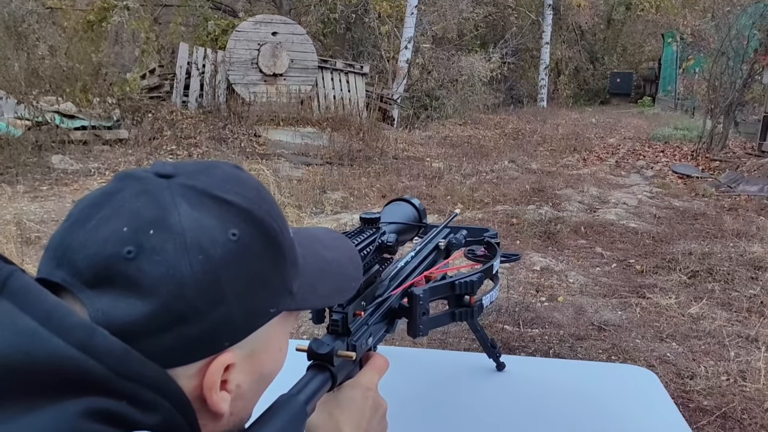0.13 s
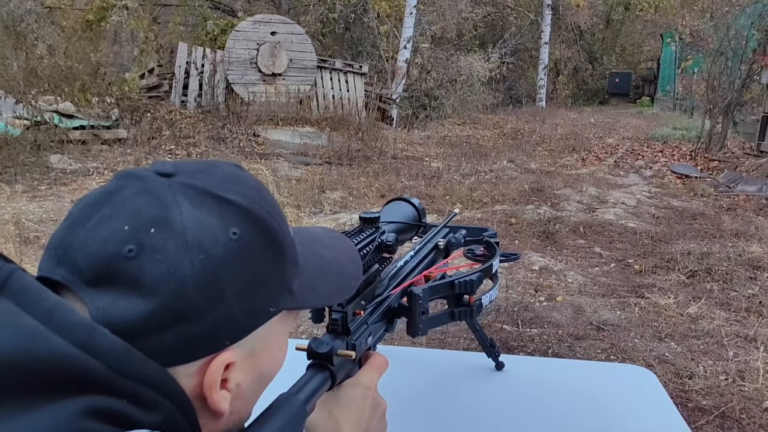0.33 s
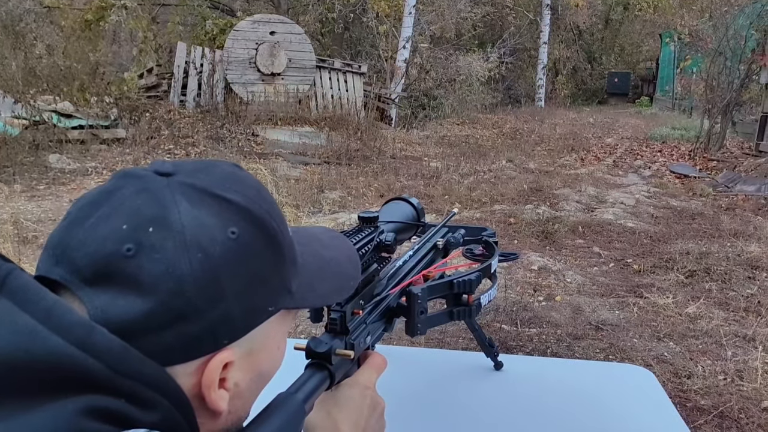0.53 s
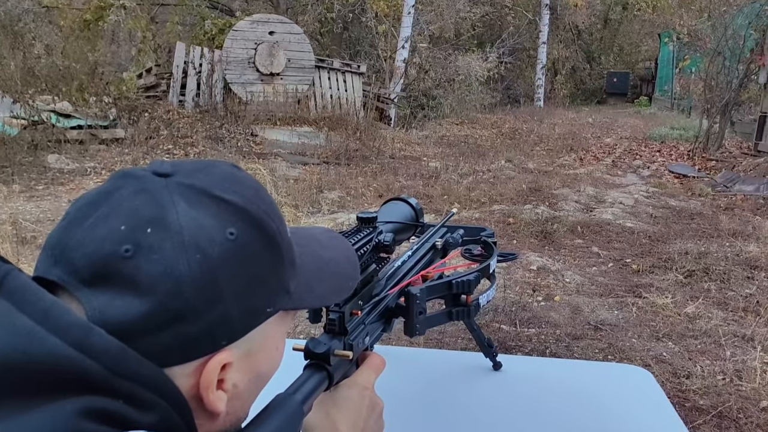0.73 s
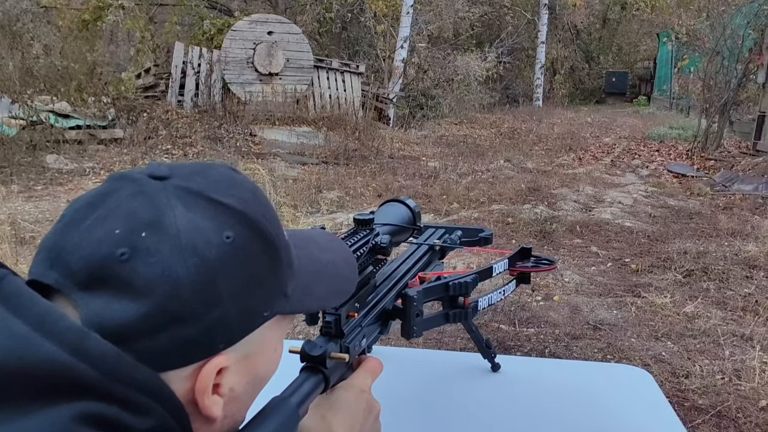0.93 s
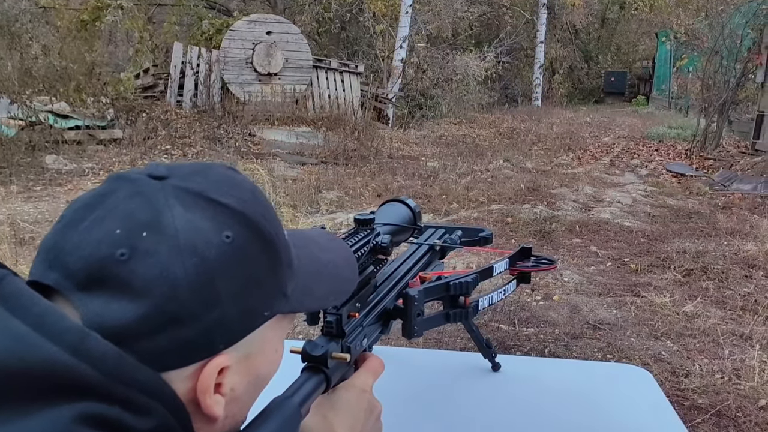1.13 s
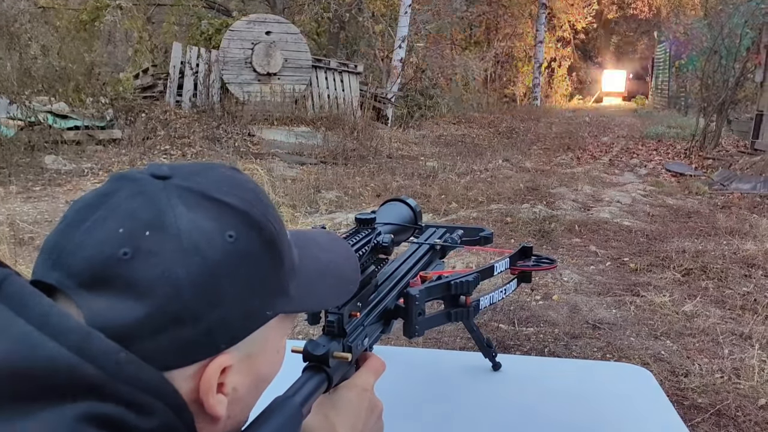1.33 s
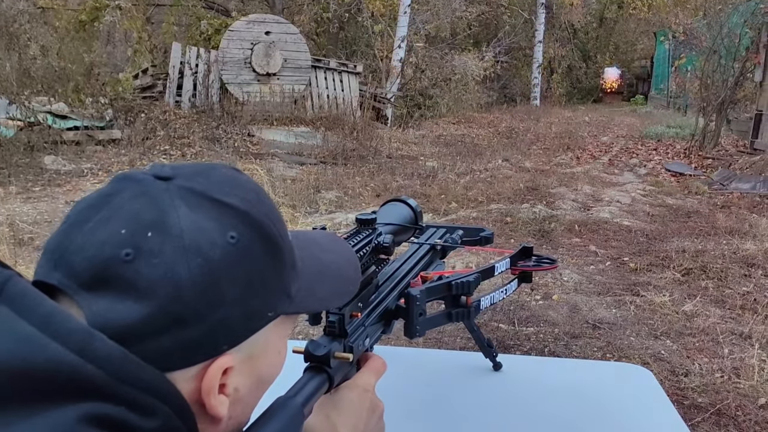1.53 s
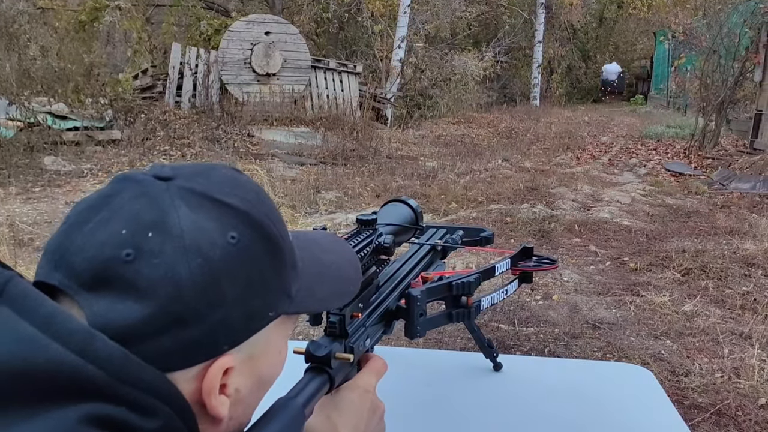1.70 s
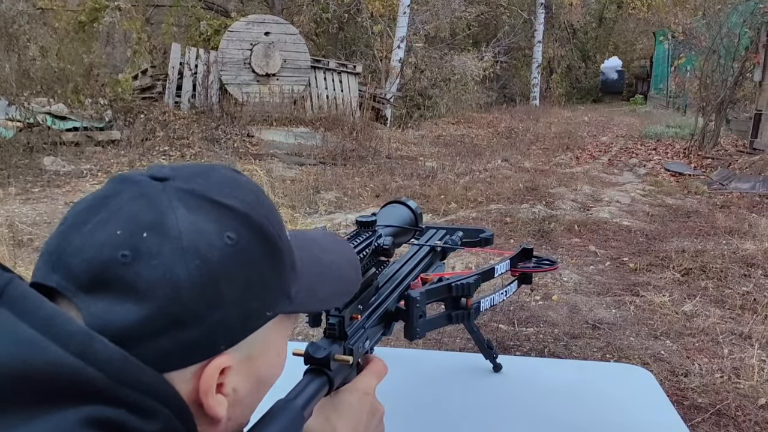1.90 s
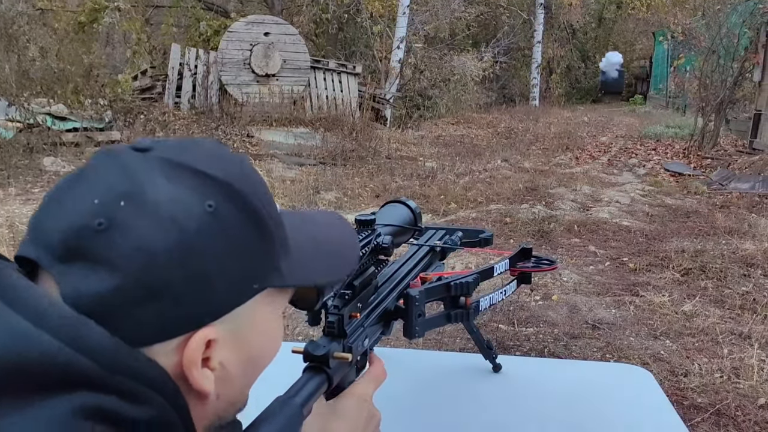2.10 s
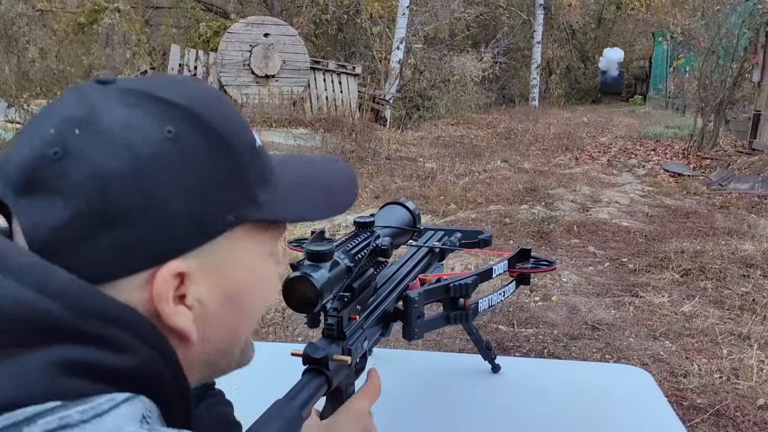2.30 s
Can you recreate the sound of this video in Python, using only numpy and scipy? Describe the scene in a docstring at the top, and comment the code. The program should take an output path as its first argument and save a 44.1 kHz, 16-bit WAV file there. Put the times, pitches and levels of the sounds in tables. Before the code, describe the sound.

A crossbow fires close to the microphone with a latch click and string slap, its bolt whistles away, and a distant charge bangs and echoes through trees; a far dog yelps beforehand.

```python
"""Crossbow shot at an explosive target

A far dog yelps and howls in a wooded yard: harmonics through a mouth resonance, blurred by trees.
A crossbow fires from a table: noise bursts for latch and string, decaying modes for rattle and limbs.
The bolt's whistle is a tone lowered by its speed; echoes from things ahead come back raised in pitch.
A small charge on the target cracks, the target box thumps, and ground, fence and trees return the sound."""
import sys
import numpy as np
from scipy import signal
from scipy.fft import rfft, irfft
from scipy.io import wavfile
from scipy.ndimage import uniform_filter1d

SR = 44100
rng = np.random.default_rng(int(sys.argv[2]) if len(sys.argv) > 2 else 0)


def store_wav(level_fs):
    """Save 16-bit WAV to argv[1]."""
    pcm = np.round(np.clip(np.atleast_2d(level_fs), -1, 1) * 32767)
    wavfile.write(sys.argv[1], SR, pcm.T.astype(np.int16))


N = 103811
T, HZ = np.arange(N) / SR, np.fft.rfftfreq(N, 1 / SR)
RELEASE_S, BANG_S = 1.004, 1.5701
SOUND_M_PER_S = 343


def amp(db):
    """Decibels to gain."""
    return 10 ** (np.asarray(db) / 20)


def unit(x):
    """Scales to rms 1."""
    return x / np.sqrt(np.mean(x ** 2) + 1e-20)


def read(points, hz=HZ):
    """Interpolates a table over log frequency."""
    f, value = np.transpose(points)
    return np.interp(np.log(hz + 1), np.log(f + 1), value)


def curve(rows):
    """Interpolates a table over time."""
    return np.interp(T, *np.transpose(rows))


def drift(hz):
    """Smooth random wander of rms 1, up to a rate."""
    spectrum = rfft(rng.standard_normal(N))
    return unit(irfft(spectrum / (1 + (HZ / hz) ** 4), N))


def place(x, pan_db, lag_s=0):
    """Stereo position: left minus right level (positive = left), and delay of the left ear."""
    turn = np.array([np.exp(-2j * np.pi * HZ * lag_s), np.ones(len(HZ))])
    return irfft(rfft(x) * turn, N) * amp([[pan_db / 2], [-pan_db / 2]])


def noise(colour, same):
    """Coloured stereo noise of rms 1 and given left-right correlation."""
    a, b = rfft(rng.standard_normal((2, N)))
    c = np.clip(read(same), -1, 1)
    pair = np.array([a, c * a + np.sqrt(1 - c ** 2) * b])
    return unit(irfft(pair * amp(read(colour)), N))


def struck(start_s, rise_s, t60_s):
    """Straight rise, then exponential decay."""
    rise = np.clip((T - start_s) / rise_s, 0, 1)
    return rise * np.exp(-np.log(1000) * np.maximum(T - start_s - rise_s, 0) / t60_s)


def knocks(rows, colour, same):
    """Dense, heavily damped vibration: noise bursts whose powers add."""
    power = sum((amp(db) * struck(s, rise, t60)) ** 2 for s, db, rise, t60 in rows)
    return noise(colour, same) * np.sqrt(power)


def ring(start_s, modes, rise_s):
    """Decaying modes set going by one blow."""
    return sum(amp(db) * struck(start_s, rise_s, t60) * np.sin(2 * np.pi * hz * (T - start_s))
               for hz, db, t60 in modes)


def tail(start_s, rise_s, colour, t60s, same):
    """Diffuse echoes: nine overlapping bands, each dying at its own speed."""
    spectrum = rfft(noise(colour, same))
    centres = np.geomspace(60, 15000, 9)
    total = 0
    for hz, share in zip(centres, np.eye(len(centres))):
        band = irfft(spectrum * read(list(zip(centres, share))), N)
        total = total + band * struck(start_s, rise_s, read(t60s, hz))
    return total


# air spectrum: f/Hz, relative density/dB
AIR_COLOUR = [(12, -54), (20, -12), (65, 0.5), (187, -12), (480, -16), (738, -19), (2320, -24),
              (7520, -35.5), (16000, -70)]
# air left-right correlation: f/Hz, correlation/1
AIR_CORRELATION = [(120, 0.87), (700, 0.11), (7000, 0.32)]


def outdoor_air():
    """Quiet broadband air noise with a slight level flutter."""
    return amp(-59) * noise(AIR_COLOUR, AIR_CORRELATION) * amp(0.54 * drift(18))


# dog calls: t/s, length/s, start f/Hz, top f/Hz, end f/Hz, level/dB (dry harmonic at resonance), mouth f/Hz
DOG_CALLS = [(0.544, .09, 478.7, 529.3, 406.7, -45.5, 1010), (.61, .15, 501.8, 452, 381.7, -47.5, 873),
             (0.756, 0.1745, 434.4, 475.5, 467, -48, 481)]
MOUTH_Q, JITTER_RMS_HZ = 9.2, 10.3  # jitter where mouth f = top f
RASP_RMS, RASP_RATE_HZ = 0.22, 620
DOG_T60_S, DOG_WET_GAIN, DOG_SPREAD = 0.43, 1, 1
DOG_PAN_DB, DOG_LAG_S = -3, 0.0004  # right


def dog():
    """Far yelps with open mouth and a short closed howl: resonant harmonics blurred by the woods."""
    voice = np.zeros(N)
    for start, length, first_hz, top_hz, last_hz, db, mouth_hz in DOG_CALLS:
        u = np.clip((T - start) / length, 0, 1)
        jitter_hz = JITTER_RMS_HZ * (mouth_hz / top_hz) ** 2 * drift(200)  # rougher with open mouth
        hz = np.interp(u, [0, .5, 1], [first_hz, top_hz, last_hz]) + jitter_hz
        turns = np.cumsum(hz) / SR
        call = 0
        for k in range(1, 5):
            detune = k * hz / mouth_hz - mouth_hz / (k * hz)
            call = call + np.sin(2 * np.pi * k * turns) / np.hypot(1, MOUTH_Q * detune)
        voice += amp(db) * np.sqrt(abs(np.sin(np.pi * u))) * call
    voice *= 1 + RASP_RMS * drift(RASP_RATE_HZ)  # throat noise
    trees = rng.standard_normal((3, N)) * struck(0, 0.035, DOG_T60_S)
    trees = trees[0] + DOG_SPREAD * trees[1:]  # shared part + one per ear
    wet = signal.fftconvolve(voice[None], trees / np.linalg.norm(trees[0]), axes=1)[:, :N]
    return place(voice + DOG_WET_GAIN * wet, DOG_PAN_DB, DOG_LAG_S)


# latch and string knocks: t/s, level/dB, rise/s, t60/s
LATCH_KNOCKS = [(.9880, -31, 0.002, 0.023), (.9922, -15.5, 0.00048, 0.017)]
STRING_KNOCKS = [(.9975, -27.5, 0.004, 0.026), (1.0028, -13.5, 0.002, 0.036), (1.0062, -17, 0.00098, 0.024),
                 (1.0140, -22, 0.0003, 0.018), (1.0198, -26.5, 0.00035, .025)]
# their spectra: f/Hz, relative density/dB
LATCH_SPECTRUM = [(30, -30.5), (100, -5.5), (1000, -15), (3800, -4), (7200, -2.5), (10700, -23),
                  (16000, -19)]
STRING_SPECTRUM = [(30, -32), (120, -15), (500, -5), (1000, -7.5), (1600, -2), (2150, -0.5), (3000, 0.5),
                   (3800, -11.5), (4900, -1), (10000, -25), (16000, -27.5)]
# left-right correlation, near bow and in woods: f/Hz, correlation/1
BOW_CORRELATION = [(200, 0.64), (1400, 0.66), (4000, 0.89)]
WOODS_CORRELATION = [(150, 0.87), (300, 0.98), (1500, -0.4), (7000, 0.64), (14000, 0.99)]
# limb and stock modes: f/Hz, level/dB, t60/s (both before damper)
LIMB_MODES = [(135.8, -33.5, 0.54), (158, -26.5, 0.32), (192.3, -32.5, 0.35), (232, -30.5, 0.22),
              (465, -40, 0.33), (1531, -28.5, 0.098), (1780, -22.5, 0.02), (2213, -25, 0.035),
              (2860, -31.5, 0.071)]
# loose fitting, one ring per rebound: t/s, level/dB, f/Hz, t60/s
RATTLE_RINGS = [(1.0096, -23.5, 1003, 0.08), (1.0412, -35.5, 1065, 0.078)]
# wash off table and ground: f/Hz, relative density/dB
WASH_SPECTRUM = [(30, -26), (300, -0.5), (2000, -0.5), (2900, -4.5), (4000, -16), (7000, -8), (10000, -18),
                 (15000, -25)]
# wash decay: f/Hz, t60/s
WASH_T60 = [(100, 0.27), (2000, 0.19), (12000, 0.38)]
LIMB_RISE_S, LIMB_HALVED_S, LIMB_PAN_DB = 0.0049, 0.13, 1.5  # damper halves limbs at this age
RATTLE_RISE_S = 0.0036
WASH_DB, WASH_RISE_S = -28.5, 0.0012
BOW_PAN_DB = 0


def crossbow():
    """Latch, string slam and rattle, then the limbs hum until their dampers stop them."""
    hits = knocks(LATCH_KNOCKS, LATCH_SPECTRUM, WOODS_CORRELATION)
    hits = hits + knocks(STRING_KNOCKS, STRING_SPECTRUM, BOW_CORRELATION)
    damper = 1 / (1 + (np.maximum(T - RELEASE_S, 0) / LIMB_HALVED_S) ** 8)
    limbs = place(ring(RELEASE_S, LIMB_MODES, LIMB_RISE_S) * damper, LIMB_PAN_DB)
    rattle = sum(ring(s, [(hz, db, t60)], RATTLE_RISE_S) for s, db, hz, t60 in RATTLE_RINGS)
    wash = amp(WASH_DB) * tail(RELEASE_S, WASH_RISE_S, WASH_SPECTRUM, WASH_T60, BOW_CORRELATION)
    return place(hits + rattle + wash, BOW_PAN_DB) + limbs


# whistle heard from behind: t/s, f/Hz
WHISTLE_PITCH = [(1.03, 4485), (1.166, 4466), (1.55, 4385.5)]
# whistle level: t/s, level/dB before DIRECT_GAIN_DB
WHISTLE_LEVEL = [(1.012, -33.5), (1.478, -43), (1.53, -50.5), (1.565, -48)]
# brief level dips: t/s, width/s, change/dB
WHISTLE_DIPS = [(1.321, 0.012, -7.5)]
DIRECT_GAIN_DB, OCTAVE_REL_DB = 6.5, -39
WAVER_RMS_HZ, FLUTTER_RMS = 8, 0.2


def direct_whistle(turns):
    """Receding tone with a faint octave and unsteady amplitude."""
    tone = np.sin(2 * np.pi * turns) + amp(OCTAVE_REL_DB) * np.sin(4 * np.pi * turns)
    dips_db = sum(db * np.exp(-((T - s) / width) ** 2) for s, width, db in WHISTLE_DIPS)
    level = np.sqrt(2) * amp(curve(WHISTLE_LEVEL) + dips_db + DIRECT_GAIN_DB)
    return level * tone * (1 + FLUTTER_RMS * drift(125))


ECHO_WAVER_RMS_HZ, ECHO_FLUTTER_RMS = 13, 0.34


def glide(start, length, first_hz, last_hz, db):
    """One object returns the whistle; the pitch falls ever faster as the bolt nears it."""
    u = np.clip((T - start) / length, 0, 1)
    hz = first_hz + (last_hz - first_hz) * u ** 1.7 + ECHO_WAVER_RMS_HZ * drift(130)
    swell = np.sqrt(2 * abs(np.sin(np.pi * u)))
    tone = np.sin(2 * np.pi * np.cumsum(hz) / SR)
    return amp(db) * swell * tone * (1 + ECHO_FLUTTER_RMS * drift(70))


# ground and brush echoes: t/s, level/dB before BRUSH_GAIN_DB
BRUSH_LEVEL = [(1.03, -39.5), (1.488, -56.5), (1.555, -58.5)]
BRUSH_GAIN_DB = 4.5
SPEED_M_PER_S, DRAG_M_PER_S2 = 73, 9.8
BRUSH_SCALE_M, BRUSH_ASIDE_MAX_M = 37, 21  # spots reach about 1.5 scales ahead
BLUR_RMS_RAD, BLUR_RATE_HZ = 0.34, 160  # rough surfaces smear each echo


def brush_echoes(turns):
    """Haze of 140 reflections, each delayed and Doppler-shifted by its path from the moving bolt."""
    age = np.linspace(0, BANG_S - RELEASE_S, 200)
    flown = SPEED_M_PER_S * age - DRAG_M_PER_S2 * age ** 2 / 2
    sent = np.interp(RELEASE_S + age + flown / SOUND_M_PER_S, T, turns)  # cycles at the bolt
    blur = BLUR_RMS_RAD * drift(BLUR_RATE_HZ)

    def echo(ahead_m, aside_m):
        """The whistle by way of one object, strongest as the bolt passes it."""
        reach = np.hypot(ahead_m - flown, aside_m)
        heard = RELEASE_S + age + (reach + np.hypot(ahead_m, aside_m)) / SOUND_M_PER_S
        gain = np.interp(T, heard, aside_m / reach, 0, 0)
        return gain * np.sin(2 * np.pi * np.interp(T, heard, sent) + blur)

    along = (np.arange(140) + rng.random(140)) / 100
    aside = BRUSH_ASIDE_MAX_M * rng.uniform(.1, 1, 140)
    spots = np.transpose([BRUSH_SCALE_M * along ** 1.3, aside])
    signs = rng.choice([-1, 1], len(spots))
    brush = sum(echo(*spot) * sign for spot, sign in zip(spots, signs))
    power = abs(uniform_filter1d(brush ** 2, size=2500))
    return brush / np.sqrt(power + 1e-6) * amp(curve(BRUSH_LEVEL) + BRUSH_GAIN_DB)


# echoes from single things ahead: t/s, length/s, first f/Hz, last f/Hz, level/dB
AHEAD_ECHOES = [(1.069, 0.11, 6660, 6200, -40), (1.145, 0.067, 5220, 4710, -36),
                (1.185, .26, 6785, 6410, -45.5), (1.469, 0.13, 6545, 6400, -42)]
DIRECT_PAN_DB, ECHO_PAN_DB, WHISTLE_LAG_S = -8, -3.5, 0.00014  # right


def whistle():
    """Receding tone, raised echoes from things ahead and a brush haze, all ending at the bang."""
    flying = np.clip((T - RELEASE_S) / 0.0079, 0, 1) * np.clip((BANG_S - T) / 0.0015, 0, 1)
    turns = np.cumsum(curve(WHISTLE_PITCH) + WAVER_RMS_HZ * drift(90)) / SR
    direct = direct_whistle(turns)
    echoes = sum(glide(*row) for row in AHEAD_ECHOES) + brush_echoes(turns)
    direct = place(direct * flying, DIRECT_PAN_DB, WHISTLE_LAG_S)
    return direct + place(echoes * flying, ECHO_PAN_DB, WHISTLE_LAG_S)


# crack modes: f/Hz, level/dB, t60/s (before air loss)
CRACK_MODES = [(1870, -9, 0.0026), (2826, -2, 0.0027), (3900, -16.5, 0.0026), (8490, -7.5, .0019),
               (14200, -12, .0015)]
# puff burst: t/s, level/dB, rise/s, t60/s (before air loss)
PUFF_BURST = [(1.5702, -18, 0.00056, 0.017)]
# puff spectrum: f/Hz, relative density/dB
PUFF_SPECTRUM = [(30, -23), (100, -2.5), (400, -6), (800, -21), (2500, -4.5), (5200, -14), (8500, -7.5),
                 (16000, -47)]
# target box modes: f/Hz, level/dB, t60/s
BOX_MODES = [(76.5, -40.5, 0.42), (120, -29.5, 0.055), (307, -30.5, 0.065)]
# near echoes, then dull ones from fence and sheds: t/s, level/dB, rise/s, t60/s (before flutter)
NEAR_BURSTS = [(1.576, -33, 0.0054, 0.3)]
FENCE_BURSTS = [(1.622, -34, 0.012, 0.13), (1.765, -50, .012, 0.34)]
# fence and woods spectra: f/Hz, relative density/dB
FENCE_SPECTRUM = [(150, -14.5), (600, -3), (1000, 0.5), (2000, -40), (8000, -55)]
WOODS_SPECTRUM = [(35, -27.5), (60, -6.5), (113, -2.5), (233, -20), (330, -6), (1410, -6), (3900, -7.5),
                  (4800, -15.5), (7230, -12.5), (14600, -41.5), (16000, -75)]
# woods decay: f/Hz, t60/s
WOODS_DECAY = [(300, 0.62), (2500, 0.72), (13000, 0.34)]
CRACK_LAG_S, AIR_LOSS_HZ, BOX_RISE_CYCLES = 0.00013, 15000, 1.04
WOODS_DB, WOODS_DELAY_S, WOODS_RISE_S = -37, 0.02, 0.052


def bang():
    """The charge cracks, the target box thumps, and ground, fence and trees answer."""
    age = T - BANG_S
    pulse = sum(amp(db) * struck(BANG_S, 1 / SR, t60) * np.cos(2 * np.pi * hz * age)
                for hz, db, t60 in CRACK_MODES)
    crack = place(pulse, 0, CRACK_LAG_S) + knocks(PUFF_BURST, PUFF_SPECTRUM, BOW_CORRELATION)
    crack = signal.lfilter(*signal.butter(4, AIR_LOSS_HZ, fs=SR), crack)  # distance dulls the top
    thump = sum(ring(BANG_S, [mode], BOX_RISE_CYCLES / mode[0]) for mode in BOX_MODES)
    echoes = knocks(NEAR_BURSTS, WOODS_SPECTRUM, WOODS_CORRELATION)
    echoes = echoes + knocks(FENCE_BURSTS, FENCE_SPECTRUM, WOODS_CORRELATION)
    woods = tail(BANG_S + WOODS_DELAY_S, WOODS_RISE_S, WOODS_SPECTRUM, WOODS_DECAY, WOODS_CORRELATION)
    flutter = amp(0.95 * drift(140))
    return crack + thump + trunks() + (echoes + amp(WOODS_DB) * woods) * flutter


TRUNKS_PER_S, TRUNKS_DB, TRUNKS_T60_S, TRUNK_SPREAD_DB = 150, -44, 0.67, 3.5  # rate per ear


def trunks():
    """Single trunks return sparse sharp cracks from all sides: random coloured clicks, decaying."""
    clicks = (rng.random((2, N)) < TRUNKS_PER_S / SR) * rng.choice([-1, 1], (2, N))
    clicks = clicks * amp(TRUNK_SPREAD_DB * rng.standard_normal((2, N)))
    cracks = unit(irfft(rfft(clicks) * amp(read(WOODS_SPECTRUM)), N))
    return amp(TRUNKS_DB) * cracks * struck(BANG_S + WOODS_DELAY_S, WOODS_RISE_S, TRUNKS_T60_S)


def scene():
    """Everything over the quiet outdoor air."""
    return outdoor_air() + dog() + crossbow() + whistle() + bang()


CUT_HZ = 16000


def record(dry):
    """Peaks clip at full scale; then a low-pass limits the band."""
    lowpass = signal.firwin(255, CUT_HZ, window=("kaiser", 9), fs=SR)
    return signal.oaconvolve(np.clip(dry, -1, 1), lowpass[None], "same")


dry = scene()
out = record(dry)
store_wav(out)
```